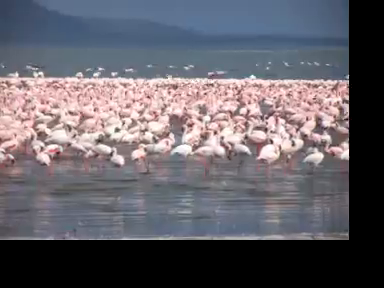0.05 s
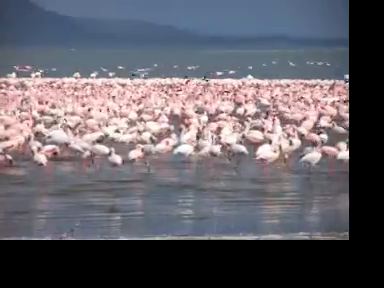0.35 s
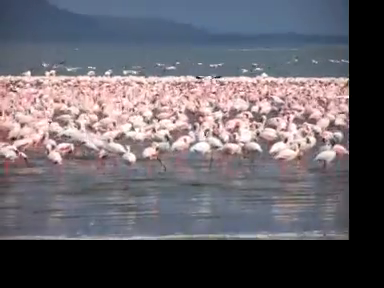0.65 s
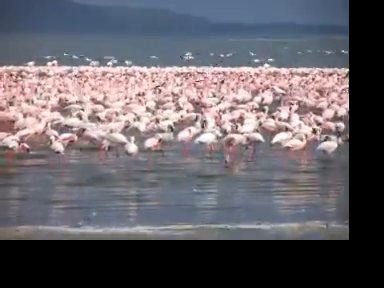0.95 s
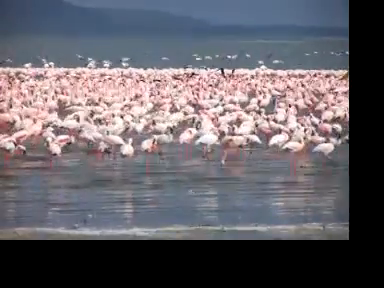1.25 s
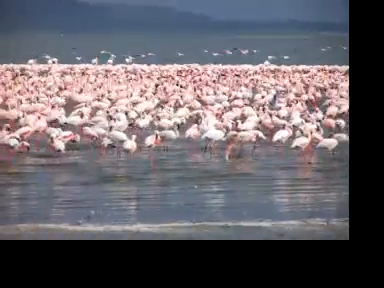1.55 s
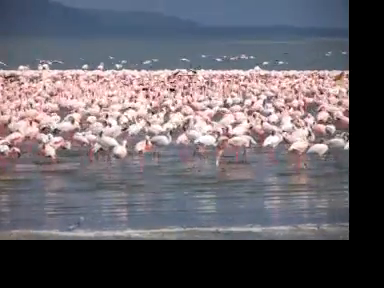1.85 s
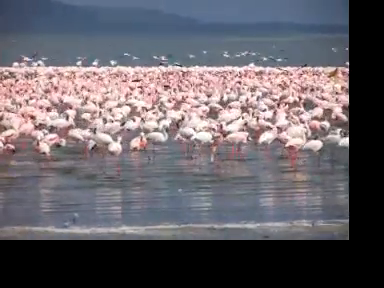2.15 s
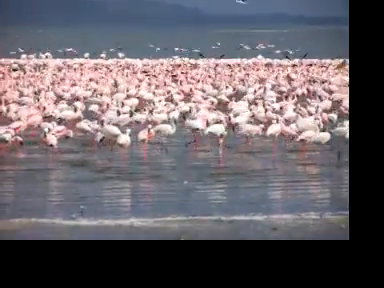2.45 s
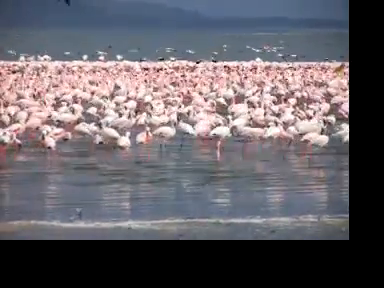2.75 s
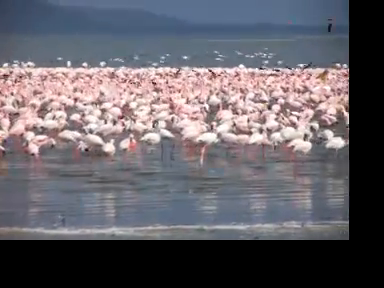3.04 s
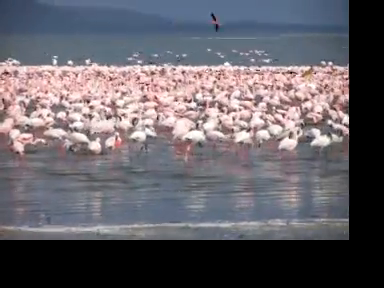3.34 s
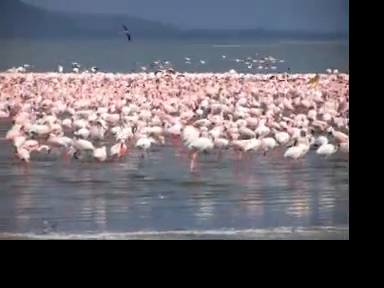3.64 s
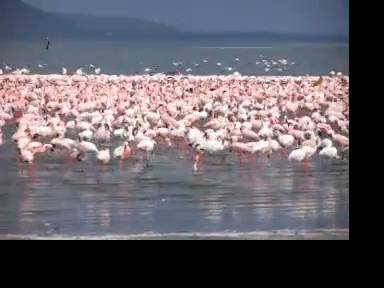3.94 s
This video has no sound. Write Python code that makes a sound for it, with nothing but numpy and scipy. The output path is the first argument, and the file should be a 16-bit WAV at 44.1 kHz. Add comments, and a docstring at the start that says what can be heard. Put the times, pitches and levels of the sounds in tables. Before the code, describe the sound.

A huge flamingo flock chatters, with nearby peeps and honks over low wind rumble.

```python
"""Flamingo flock on a lake shore

A huge flock fades in. By superposition its many far voices merge into a low gabble and a shrill
chatter. Near birds stand out with arched peeps, thin squeaks, nasal bleats and reedy honks: the
syrinx vibrates, and in bleats and honks throat resonances shape its harmonics.
Turbulent wind buffets the microphone."""
import sys
import numpy as np
from scipy import signal
from scipy.fft import rfft, irfft, next_fast_len
from scipy.io import wavfile
from scipy.ndimage import uniform_filter1d, map_coordinates

SR = 44100
rng = np.random.default_rng(int(sys.argv[2]) if len(sys.argv) > 2 else 0)


def store_pcm(level_fs):
    """Save levels as 16-bit WAV."""
    pcm = np.round(np.clip(level_fs, -1, 1) * 32767).astype(np.int16)
    wavfile.write(sys.argv[1], SR, np.atleast_2d(pcm).T)


N = 176400
JITTER_PER_S = 250  # random pitch values a second
PEEP_ROUGH, HONK_ROUGH = 0.22, 0.31  # depth of amplitude flutter


def amp(db):
    """Amplitude ratio of a level in decibels."""
    return 10 ** (np.asarray(db) / 20)


def unit(x):
    """Normalisation to rms 1."""
    return x / np.sqrt(np.mean(x ** 2) + 1e-20)


def along(points, hz):
    """Interpolation of (frequency [Hz], value) points on a logarithmic frequency axis."""
    f, v = np.transpose(points)
    return np.interp(np.log(hz + 1), np.log(f + 1), v)


def level(rows):
    """Gain per sample, interpolated from (time [s], level [dB]) rows."""
    return amp(np.interp(np.arange(N) / SR, *np.transpose(rows)))


def wobble(rate, size=N):
    """Random modulation: a spline through `rate` Gaussian values a second."""
    knots = rng.standard_normal(int(size * rate / SR) + 4)
    return map_coordinates(knots, [np.arange(size) * rate / SR])


def coloured(x, spectrum):
    """Linear filtering by (frequency [Hz], gain [dB]) rows, normalised to rms 1."""
    size = next_fast_len(N + 8192)
    gain = amp(along(spectrum, np.fft.rfftfreq(size, 1 / SR)))
    return unit(irfft(rfft(x, size) * gain, size)[:N])


def noise(spectrum):
    """Spectrally shaped Gaussian noise of rms 1."""
    return coloured(rng.standard_normal(N), spectrum)


def add(track, onset, sound):
    """Superposition of a sound on the track at onset [s]."""
    part = track[max(int(onset * SR), 0):][:len(sound)]
    part += sound[:len(part)]


def envelope(size, attack_s=0.003, release_s=0.0064):
    """Amplitude envelope: a plateau between quarter-sine ramps."""
    t = np.arange(size) / SR
    attack = np.sin(np.pi / 2 * np.minimum(t / attack_s, 1))
    release = np.sin(np.pi / 2 * np.minimum(t[::-1] / release_s, 1))
    return attack * release


def arch(length, start, middle, end):
    """Pitch contour: a parabola through three values, over length [s]."""
    u = np.linspace(-1, 1, int(length * SR))
    return middle + u * (end - start) / 2 + u * u * ((start + end) / 2 - middle)


def echo(x, t60_s=0.079, db=-11.5):
    """Scattering by the flock and the shore adds a diffuse, exponentially decaying tail."""
    t = np.arange(SR // 2) / SR
    tail = rng.standard_normal(len(t)) * np.exp(-np.log(1000) * t / t60_s)
    return x + amp(db) * signal.fftconvolve(x, tail / np.linalg.norm(tail))[:N]


def wind():
    """Turbulent pressure fluctuations at the microphone: a lumpy rumble and a few hard buffets."""
    # turbulence spectrum (frequency [Hz], relative density [dB])
    spectrum = [(20, -1.5), (90, 3), (170, -4.5), (290, -10.5), (700, -81)]
    # strength of the rumble (time [s], level [dB])
    strength = [(.8, -31.5), (2, -30), (2.33, -36.5), (2.6, -31.5), (4, -25.5)]
    # buffets (onset [s], duration [s], level [dB])
    buffets = [(0.587, 0.45, -28.5), (2.106, 0.11, -24), (2.694, 0.048, -17.5)]
    gate = np.zeros(N)
    for onset, length, db in buffets:
        add(gate, onset, amp(db) * envelope(int(length * SR)))
    rumble = unit(amp(1.5 * wobble(25.1)) * noise(spectrum))
    return level(strength) * rumble + gate * noise(spectrum)


def crowd(per_s, pitch_hz, bend, scatter_db, harmonics, call_s=0.055, spread=0.25, jitter=0.012):
    """Incoherent sum of far birds, each giving one arched call of random pitch, length and strength."""
    out, shake = np.zeros(N), wobble(JITTER_PER_S)
    birds = rng.standard_normal((int(per_s * N / SR), 5))
    for i, (when, long, high, glide, loud) in enumerate(birds):
        contour = arch(call_s * np.exp(0.3 * long), 1 - bend * (1 + glide), 1, 1 - bend * (1 - glide))
        hz = pitch_hz * np.exp(spread * high) * contour
        waver = np.resize(np.roll(shake, -int(i / per_s * SR)), len(hz))
        phase = 2 * np.pi * np.cumsum(hz * (1 + jitter * waver)) / SR
        tone = sum(np.sin(k * phase + k * k * when) for k in range(1, harmonics + 1))
        add(out, (i + when) / per_s, amp(scatter_db * np.tanh(loud)) * tone * envelope(len(hz)))
    return unit(out)


def gabble():
    """Superposition of low nasal grunts; the farthest blur into noise."""
    # spectral envelope of the far grunts (frequency [Hz], relative gain [dB])
    spectrum = [(90, -20), (160, -5.5), (430, 0), (800, -6.5), (1300, -20), (2500, -72)]
    grunts = crowd(per_s=120, pitch_hz=188.6, bend=0.0812, scatter_db=8, harmonics=6)
    return amp(-27) * unit(coloured(grunts, spectrum) + noise(spectrum))


def patchy(x, depth_db=2):
    """Random modulation in time and frequency, as unresolved hoarse calls come and go."""
    spectra = signal.stft(x, nperseg=256)[2]
    patches = uniform_filter1d(rng.standard_normal(spectra.shape), size=5, axis=0)
    patches = uniform_filter1d(patches, size=16, axis=1)
    return unit(signal.istft(spectra * amp(depth_db * unit(patches)), nperseg=256)[1][:N])


def chatter():
    """Superposition of shrill cries and peeps; the farthest blur into flickering noise."""
    # spectral envelope of the far shrill calls (frequency [Hz], relative gain [dB])
    spectrum = [(500, -59.5), (1100, -12), (1520, -3), (2400, 2), (3300, -1.5), (4400, -9.5), (5400, -10.5),
                (8200, -31), (9000, -57.5)]
    # strength of the chatter (time [s], level [dB])
    strength = [(1.1, -26), (1.32, -22.5), (1.6, -24.5), (1.9, -27), (2.25, -24.5), (3.2, -24.5),
                (3.42, -28), (3.7, -25.5)]
    cries = crowd(per_s=240, pitch_hz=1399, bend=0.03975, scatter_db=1.5, harmonics=4)
    far_peeps = crowd(per_s=150, pitch_hz=3198, bend=0.0399, scatter_db=3.5, harmonics=2)
    calls = coloured(echo(cries + far_peeps), spectrum)
    blur = amp(1.67 * wobble(160)) * patchy(noise(spectrum))
    return level(strength) * unit(calls + blur)


def syrinx(hz, gains, rough, hoarse_db=-13, skirt_hz=807, jitter=0.0042):
    """Quasi-periodic vibration: pitch jitters, and each harmonic flutters amid noisy sidebands."""
    size = len(hz)
    phase = 2 * np.pi * np.cumsum(hz * (1 + jitter * wobble(JITTER_PER_S, size))) / SR
    tone = np.zeros(size)
    for k, gain in enumerate(gains, 1):
        skirt = wobble(2 * skirt_hz, size) + 1j * wobble(2 * skirt_hz, size)
        carrier = np.exp(1j * (k * phase + rng.uniform(0, 2 * np.pi)))
        flutter = rough * wobble(130, size)
        tone += gain * np.imag(carrier * (1 + flutter + skirt * amp(hoarse_db) / np.sqrt(2)))
    return np.sqrt(2) * tone * envelope(size)


def peeps(rest_hz=3600, arch_hz=80.6):
    """Frequency modulation arches one partial; a peep above the resting pitch starts and ends near it."""
    # near peeps (onset [s], duration [s], middle pitch [Hz], net glide [Hz], level [dB])
    calls = [(0.462, 0.072, 3460, -130, -22.5), (0.544, .075, 3550, -150, -27.5),
             (0.635, 0.068, 3730, -81, -21.5), (0.757, 0.061, 4010, -100, -25.5),
             (0.874, 0.051, 3930, 16, -26.5), (0.987, .075, 3560, -50, -28), (1.41, .2, 2430, -55, -32),
             (1.547, 0.05, 3600, -150, -29.5), (1.674, 0.04, 3570, -110, -26.5),
             (2.444, .082, 3380, -300, -29), (2.522, .058, 3615, -63, -26), (2.57, 0.054, 3325, -110, -23),
             (2.618, 0.026, 2940, -93, -25.5), (2.641, 0.028, 3760, 351, -28),
             (2.675, .08, 2020, 102, -32.5), (2.722, .052, 3310, -65, -23.5), (2.712, .06, 3900, 63, -29),
             (2.807, 0.057, 3880, -100, -25.5), (2.853, 0.059, 3010, -430, -27.5),
             (3.539, .06, 1736, 331, -35), (3.616, 0.12, 3250, -61, -29.5),
             (3.817, 0.048, 3260, -170, -31.5)]
    out = np.zeros(N)
    for onset, length, hz, glide, db in calls:
        foot = min(hz, rest_hz) - arch_hz
        pitch = arch(length, foot - glide / 2, hz, foot + glide / 2)
        add(out, onset, amp(db) * syrinx(pitch, [1], PEEP_ROUGH))
    return out


def squeaks():
    """Linear frequency sweeps of one high partial."""
    # thin squeaks (onset [s], duration [s], start pitch [Hz], end pitch [Hz], level [dB])
    calls = [(1.382, 0.036, 7300, 5670, -36.5), (1.422, .02, 5940, 8160, -40.5),
             (1.422, .09, 6120, 6200, -40), (2.081, 0.028, 4430, 4990, -31), (3.336, 0.04, 5740, 5720, -41)]
    out = np.zeros(N)
    for onset, length, start, end, db in calls:
        pitch = np.linspace(start, end, int(length * SR))
        add(out, onset, amp(db) * syrinx(pitch, [1], PEEP_ROUGH))
    return out


def throat(hz, tilt_db):
    """Source and filter: throat resonances weight six harmonics of the syrinx."""
    # transfer function of a honking throat (frequency [Hz], gain [dB])
    response = [(1500, -8), (2900, 2.5), (3350, 0), (4950, -5), (5170, 12), (5400, 3.5), (5800, -9.5),
                (7000, -7), (8800, -37.5)]
    gains = [amp(along(response, (k + 1) * hz) + tilt_db * k) for k in range(6)]
    return syrinx(hz, gains, HONK_ROUGH)


def honks(sag=0.038):
    """Reedy harmonic tones under frequency modulation: short honks sag, a long one quavers."""
    # short honks (onset [s], duration [s], nominal pitch [Hz], source level [dB], tilt [dB/harmonic])
    short_honks = [(2.074, .022, 1513, -23, -1.5), (2.116, 0.045, 1500, -23, -3),
                   (2.208, .07, 1440, -24.5, -4)]
    # course of the long honk (time [s], pitch [Hz], source level [dB])
    long_honk = [(1.135, 1648, -31.5), (1.172, 1540, -22.5), (1.195, 1608, -21.5), (1.211, 1730, -25),
                 (1.226, 1769, -24.5), (1.24, 1632, -23.5), (1.256, 1712, -22.5), (1.272, 1680, -27),
                 (1.286, 1708, -23), (1.31, 1522, -20.5)]
    out = np.zeros(N)
    for onset, length, hz, db, tilt_db in short_honks:
        pitch = hz * arch(length, 1 + sag / 2, 0.97, 1 - sag)
        add(out, onset, amp(db) * throat(pitch, tilt_db))
    times, hz, db = np.transpose(long_honk)
    t = np.arange(times[0], times[-1], 1 / SR)
    quaver = throat(np.interp(t, times, hz), tilt_db=-3)
    add(out, times[0], amp(np.interp(t, times, db)) * quaver)
    return out


def formant(hz, centre_hz, half_width_hz=450):
    """Band-pass gain of one throat resonance."""
    return 1 / (1 + ((hz - centre_hz) / half_width_hz) ** 4)


def bleats(upper_hz=5670, upper_db=-15, sag=0.02):
    """Formant filtering: two throat resonances select the harmonics of a low, nasal voice."""
    # nasal bleats (onset [s], duration [s], lower formant [Hz], level [dB])
    calls = [(0.335, 0.051, 4730, -28), (0.394, .044, 4550, -28.5), (0.699, .067, 2908, -28.5),
             (.855, .048, 2960, -27.5), (1.295, 0.082, 3150, -29), (2.043, .12, 3310, -33),
             (2.461, 0.15, 3190, -26.5), (2.861, .055, 3317, -24.5), (3.121, 0.16, 3500, -33),
             (3.635, 0.092, 3420, -29)]
    out = np.zeros(N)
    for onset, length, lower_hz, db in calls:
        hz = lower_hz / 9.6 * arch(length, 1 + sag / 2, 0.98, 1 - sag)  # formant near harmonic 10
        gains = [formant(k * hz, lower_hz) + amp(upper_db) * formant(k * hz, upper_hz)
                 for k in range(1, 20)]
        add(out, onset, amp(db) * unit(syrinx(hz, gains, HONK_ROUGH, hoarse_db=-6)))
    return out


def scene():
    """Superposition of the far flock, the wind and the near birds with their echo, in mono."""
    background = gabble() + chatter() + wind()
    near_birds = peeps() + squeaks() + honks() + bleats()
    return (background + echo(near_birds))[None]


def record(dry, cutoff_hz=9000):
    """A rising gain fades the sound in, and an ideal low-pass filter limits its bandwidth."""
    # fade-in, applied on top of all source levels (time [s], gain [dB])
    fade = [(.332, -74), (.338, -24.5), (.5, -18), (.76, -0.5)]
    size = next_fast_len(N + SR // 2)
    passband = np.fft.rfftfreq(size, 1 / SR) < cutoff_hz
    return irfft(rfft(dry * level(fade), size) * passband, size)[:, :N]


dry = scene()
out = record(dry)
store_pcm(out)
```